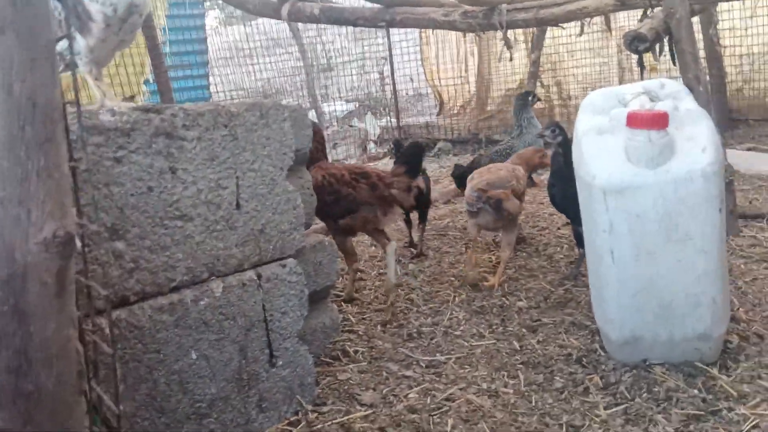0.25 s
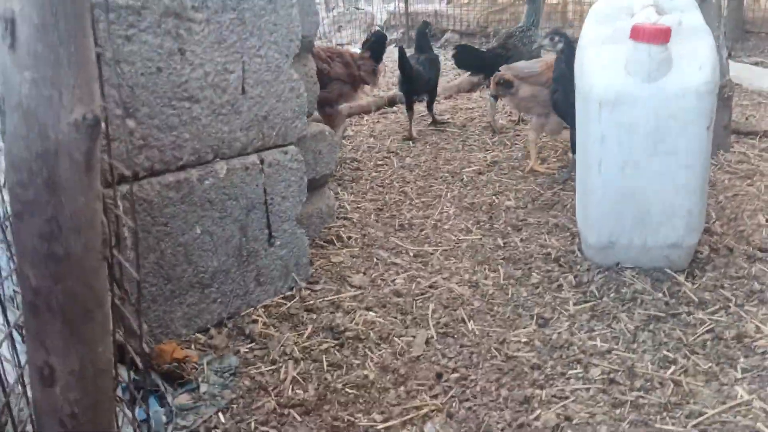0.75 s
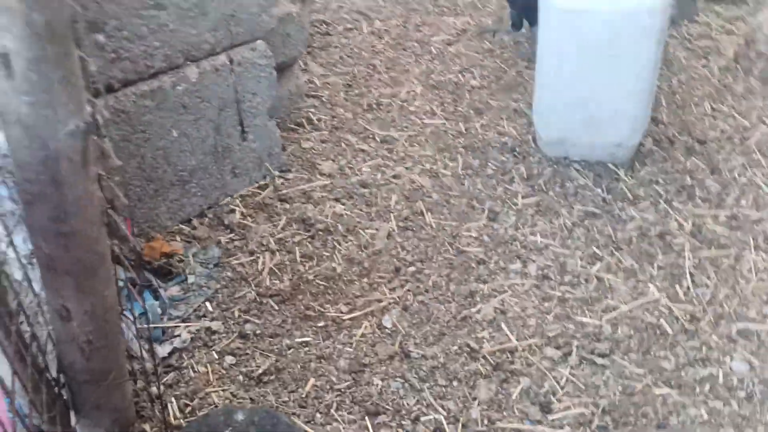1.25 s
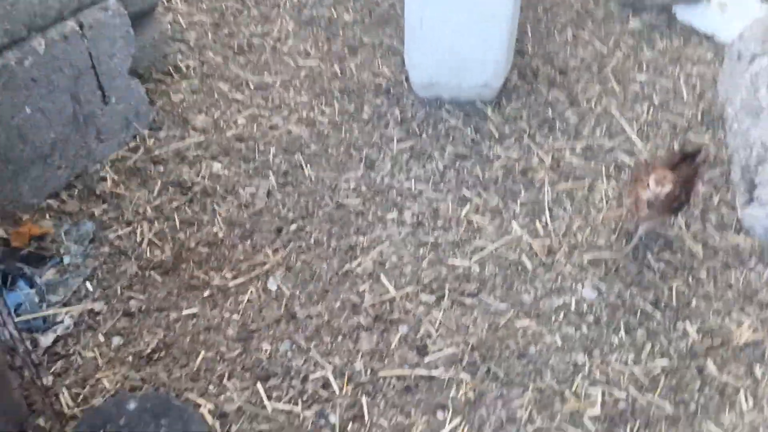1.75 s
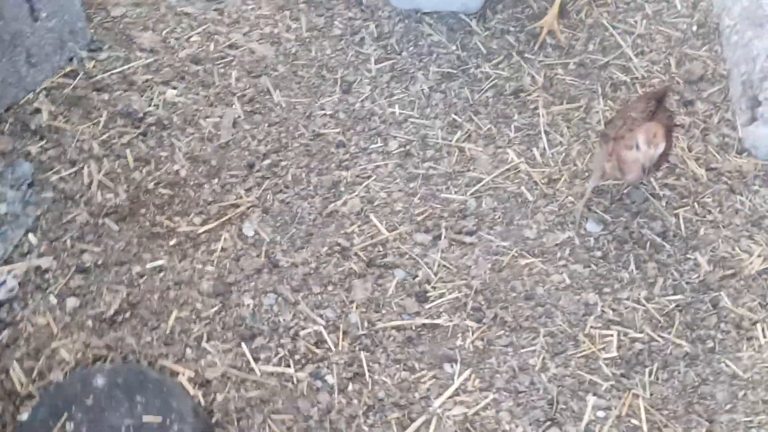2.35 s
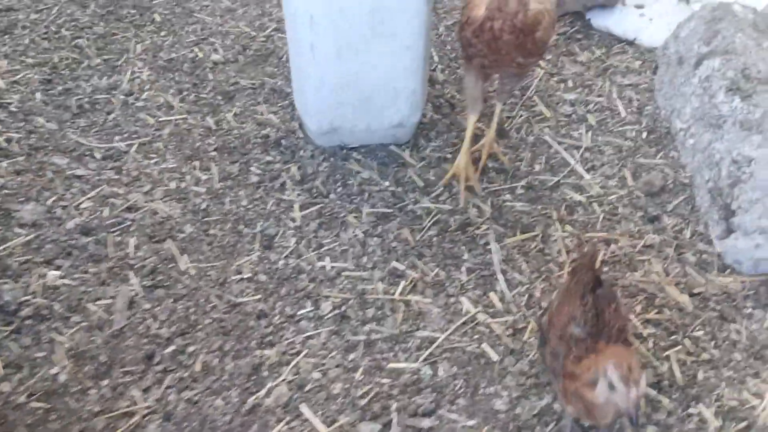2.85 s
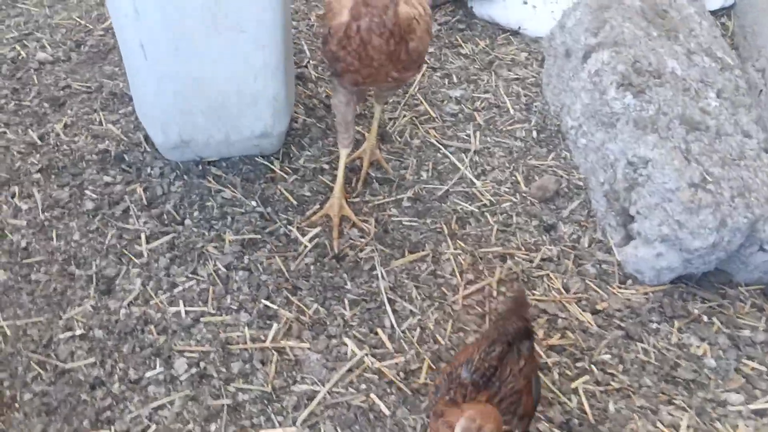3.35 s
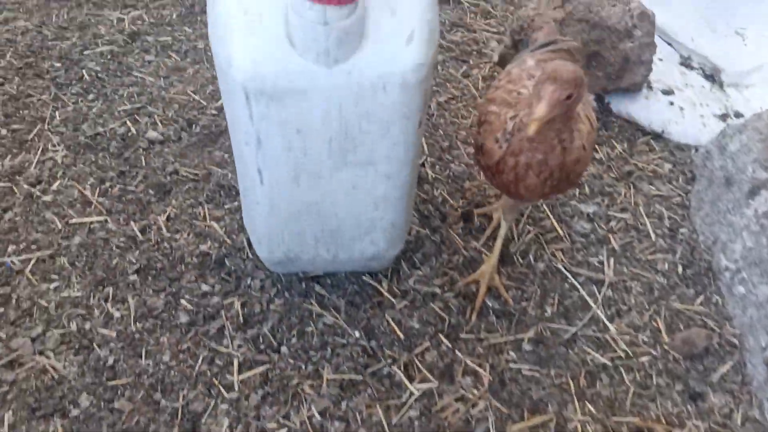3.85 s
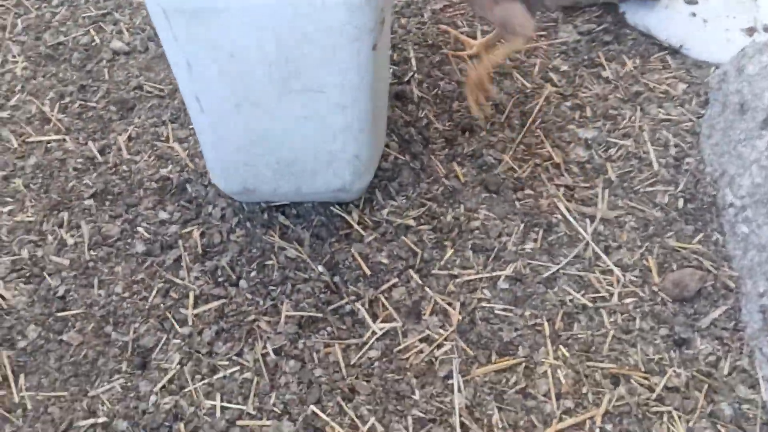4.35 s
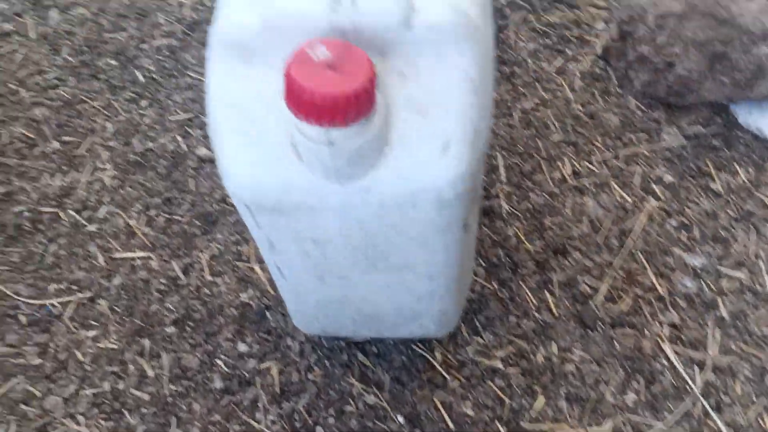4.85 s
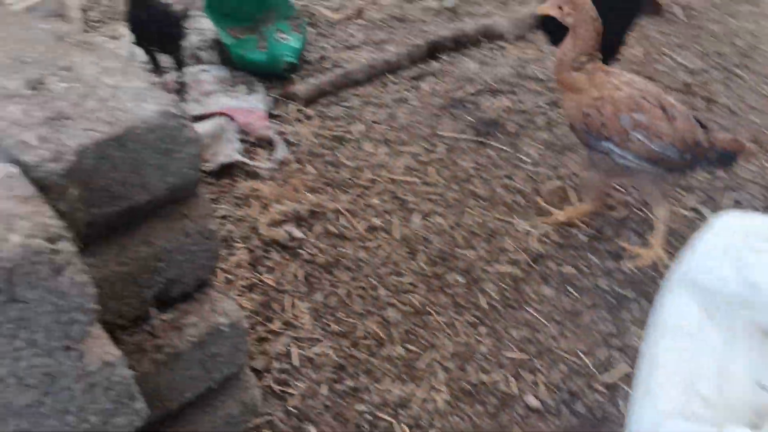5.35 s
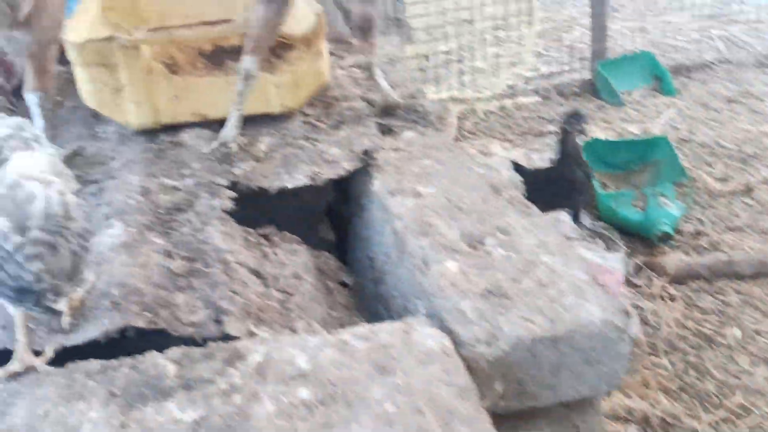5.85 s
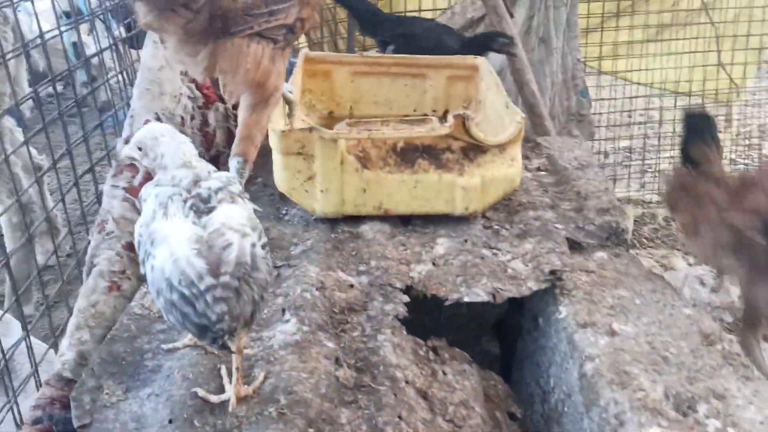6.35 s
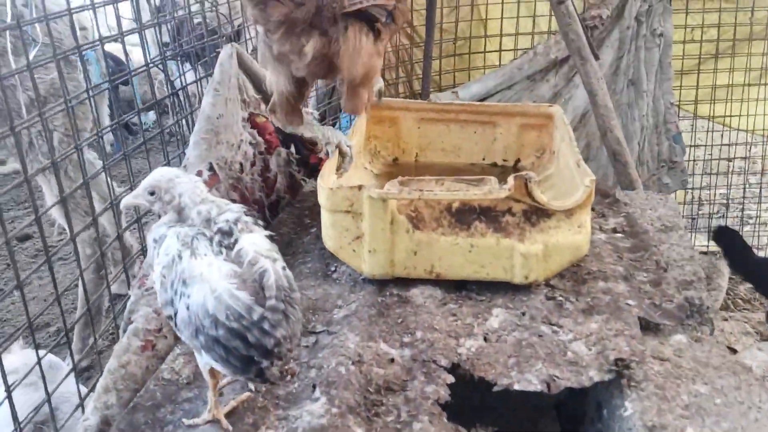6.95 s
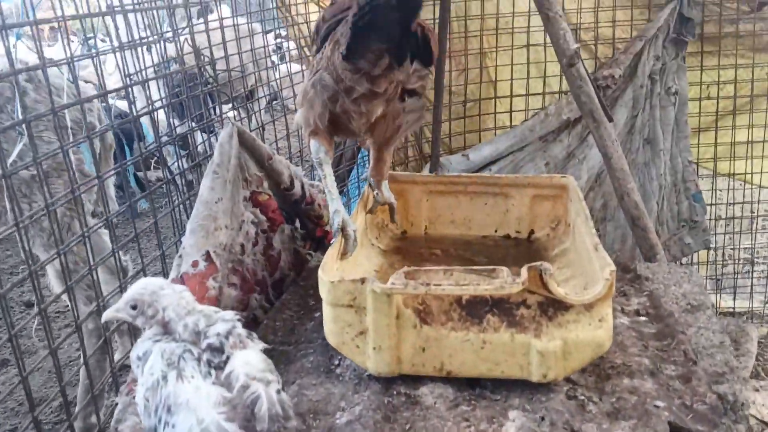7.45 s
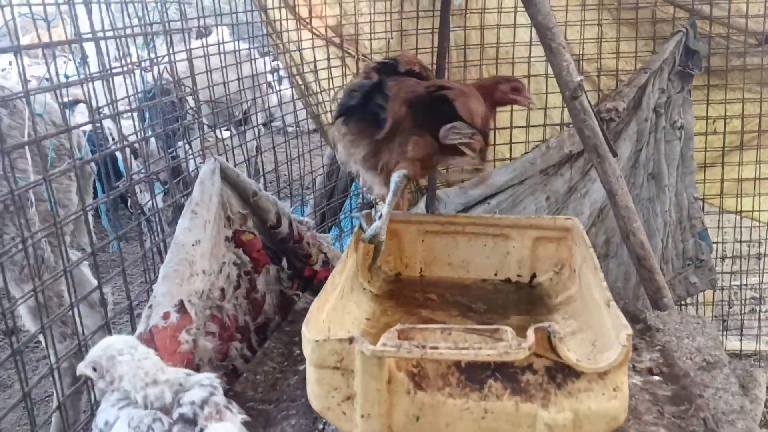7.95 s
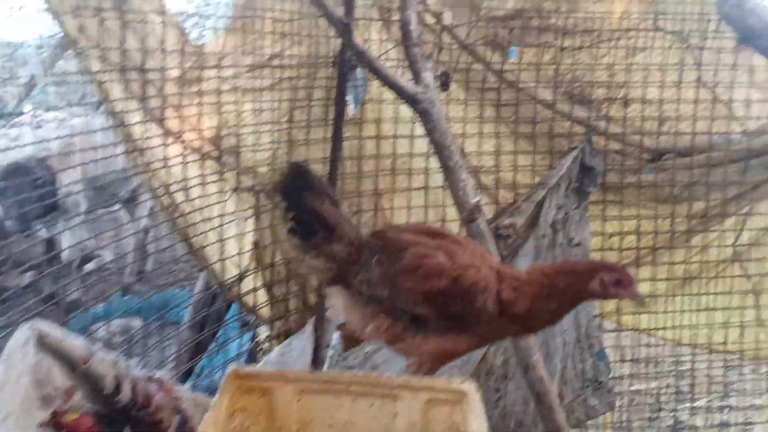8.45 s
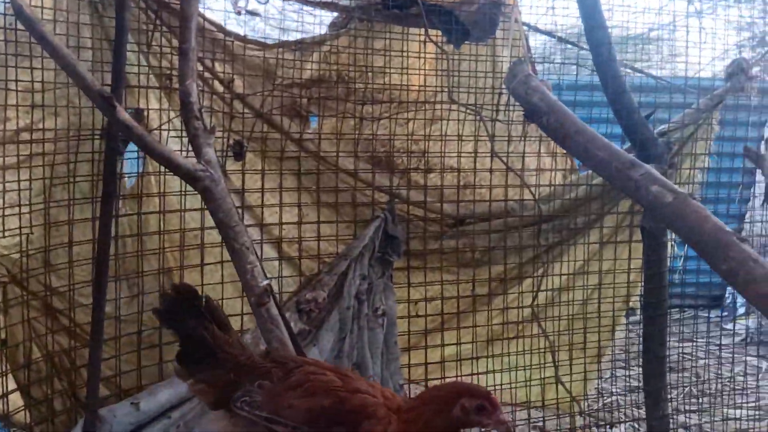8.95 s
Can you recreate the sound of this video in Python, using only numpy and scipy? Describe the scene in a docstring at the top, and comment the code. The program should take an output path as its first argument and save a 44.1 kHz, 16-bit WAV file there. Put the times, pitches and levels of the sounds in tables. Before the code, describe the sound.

Throughout, a small straw-floored coop murmurs with soft shuffling and faint distant cheeping. From 0 to 2.7 s, near chicks give short falling peeps around 3.5 kHz, with quiet clucks, a sharp straw scuff and footfall near 0.65 s, and a stronger peep at 2.6 s. At 2.8 s a close lamb hums nasally, then opens into a loud bright bleat, steady until 3.3 s, then shaking, leaning left and closing by 3.75 s. A low rattling croak and a piercing squeal come around 4.1 s. Heavy steps thud at 4.75 and 5.3 s amid straw scratching; a hoarse ewe bleats, throbbing, from 5.4 to 5.9 s. Peeps, clucks and thin whistles continue. From 7.1 s a plastic trough is knocked dully, brighter near 8 s; finger taps boom on the right from 7.6 s, wire pings at 8.35 s, and clucks grow clearer toward 9.1 s. Reverberation is short.

```python
"""Shuffling feet and peeping chicks open a straw-floored coop, heard at the two ports of a handheld phone.
Pullets cluck, scratch, knock a trough and peck the mesh; a lamb bleats close by and a hoarse ewe answers.
Chicks are gliding sines; clucks and bleats are throat pulses through resonances; straw and feet are shaped
noise; struck things ring as decaying sines. Later a finger taps the right port. The walls answer, and the
phone's suppressor pulls the background down between sounds."""
import sys
import numpy as np
from scipy import signal
from scipy.fft import rfft, irfft, next_fast_len
from scipy.io import wavfile
from scipy.ndimage import uniform_filter1d, map_coordinates

SR = 44100
rng = np.random.default_rng(int(sys.argv[2]) if len(sys.argv) > 2 else 0)


def to_wav(sig):
    """Store sig (one row per channel, or 1-D mono) as 16-bit WAV at the path in sys.argv[1].

    Samples outside -1..1 are clipped; the rate is SR.
    """
    pcm = np.clip(np.atleast_2d(sig), -1, 1) * 32767
    pcm = np.round(pcm).astype(np.int16)
    wavfile.write(sys.argv[1], SR, pcm.T)  # frames by channels


def gain_from_decibels(decibels):
    """Convert decibel values to linear amplitude factors."""
    exponent = np.asarray(decibels, float) / 20
    return 10 ** exponent


N = 405719

# shuffling feet all round, drifting between points: (start_s, thud_level_db, crackle_level_db)
BUSTLE = [(0, -66, -88.5), (0.58, -78, -69.5), (1.48, -68, -96.5), (2.85, -82, -76), (3.72, -77, -77),
          (4.85, -55.5, -76), (5.21, -78.5, -74), (6.34, -75, -91), (9.2, -73, -88.5)]
# heavy footfalls: (start_s, level_db)
STEPS = [(0.659, -52), (1.37, -62.5), (4.265, -55.5), (4.747, -41), (5.325, -37.5)]
STEP_T60_S = .25
# noise colour of feet on the floor: (frequency_hz, level_db)
THUD_COLOUR = [(25, -40), (45, -15), (90, 3.5), (200, -5.5), (900, -33)]
# noise colour of the flock's murmur: (frequency_hz, level_db)
MURMUR_COLOUR = [(300, -7.5), (1800, 0), (2700, 0.5), (3600, -7.5), (6500, -8), (8000, -28)]
# noise colour of bright straw stalks: (frequency_hz, level_db)
STRAW_COLOUR = [(3000, -29.5), (4500, -16), (6300, 4), (9000, -13), (11500, -9), (15200, -1.5),
                (16500, -29)]

# peeps of the near chicks, all falling alike: (start_s, top_hz, level_db)
PEEPS = [(0.053, 3459, -50), (0.145, 3533, -50), (0.3, 3602, -50.5), (0.746, 3509, -52.5),
         (0.887, 3782, -49.5), (1.079, 3509, -49.5), (1.352, 2986, -63.5), (4.322, 3620, -57.5),
         (1.42, 3148, -57.5), (1.498, 3314, -57), (1.662, 3465, -50), (1.805, 3505, -49.5),
         (2.254, 3515, -55.5), (2.415, 3579, -51.5), (2.629, 3589, -40), (3.8, 3575, -55),
         (4.862, 3354, -50.5), (5.894, 3432, -46), (6.081, 3470, -54)]
PEEP_LENGTH_S, PEEP_END_RATIO = .045, .74  # last pitch over the top
# short sagging chirps: (start_s, length_s, pitch_hz, level_db)
CHIRPS = [(0.082, 0.04024, 2744, -59), (4.671, 0.03753, 3022, -50.5), (4.863, 0.11854, 2634, -55),
          (0.952, 0.02221, 2402, -48), (0.973, 0.01292, 1608, -53.5), (1.113, 0.06043, 3016, -52),
          (1.541, 0.07446, 1790, -58), (1.588, 0.02187, 1338, -60.5), (1.085, 0.0255, 2283, -57),
          (3.98, 0.022, 3278, -40), (4.271, 0.02352, 1329, -40.5), (4.92, 0.02836, 1587, -45),
          (5.37, 0.055, 3228, -37), (6.129, 0.021376, 1554, -45.5), (6.306, 0.0438, 3090, -57),
          (8.157, 0.075, 2562, -60.5), (8.987, 0.05291, 1245, -54.5), (9.158, 0.0413, 3025, -57)]
CHIRP_END_RATIO = 0.93
# long high whistles: (start_s, length_s, top_hz, level_db)
WHISTLES = [(.44, .12, 6000, -60), (5.66, .11, 4800, -56), (6.385, .1, 3900, -59), (6.68, .05, 5000, -52),
            (7.15, .12, 6400, -56), (8.015, .14, 5600, -55)]
WHISTLE_FALL_HZ_PER_S = 16000
# falling squeals; the loudest, from a startled chick close by, is three overlapping glides:
# (start_s, length_s, start_hz, end_hz, level_db)
SQUEALS = [(4.163, .036, 4550, 3450, -26), (4.197, .11, 3400, 2450, -49), (4.19, .03, 3100, 1800, -47),
           (6.905, .12, 3300, 2750, -59)]
HOOK_S, HOOK_DEPTH = .006, 0.048  # a call slides up into its top note: time constant, share of the pitch

# claws and beaks in straw: (start_s, stalks_level_db, scuff_level_db, t60_s)
SCRATCHES = [(0.1688, -72.5, -46.5, 0.105), (0.462, -75, -56.5, 0.7619), (0.608, -56.5, -37, 0.04139),
             (0.6685, -53, -20.5, 0.014157), (2.19, -89.5, -60, 0.092), (2.517, -65, -60.5, 0.07234),
             (2.743, -54.5, -35, 0.11187), (2.833, -55, -38.5, 0.02562), (3.635, -56, -72.5, 0.03951),
             (3.914, -43.5, -77.5, 0.04432), (4.4297, -65.5, -76, 0.1286), (4.722, -53, -42.5, 0.37644),
             (4.836, -66.5, -49, 0.05066), (4.879, -59.5, -48, 0.16315), (4.9466, -51.5, -45, 0.10116),
             (5.302, -50.5, -46.5, 0.3362), (5.892, -60, -42, 0.1317), (6.065, -77.5, -59.5, 0.3822),
             (6.265, -79, -54, 0.13993), (6.551, -62.5, -52, 0.05853), (6.349, -65.5, -54, 0.06974),
             (6.743, -64, -69.5, 0.12), (6.976, -75, -55.5, 0.3101), (7.962, -79, -58.5, 0.715),
             (8.3412, -52, -53.5, 0.07392)]
# noise colour of the duller scuff: (frequency_hz, level_db)
SCUFF_COLOUR = [(150, -4), (400, 0), (1200, -3), (2600, -4), (4000, -14), (6000, -35.5)]
# pullets' clucks, and at 5.247 s a longer low hum leading into the ewe's bleat:
# (start_s, length_s, pitch_hz, level_db, beak_resonance_hz)
CLUCKS = [(0.438, 0.11605, 376.5, -60, 719.3), (1.87, 0.03615, 395.8, -57, 561.4),
          (1.978, 0.05755, 393.6, -53.5, 486), (3.987, 0.051325, 352.7, -53.5, 680),
          (5.247, 0.25052, 321.4, -53.5, 330.2), (5.6, 0.018427, 229.2, -48, 697.2),
          (6.556, 0.05068, 349.9, -64, 708), (4.462, 0.01728, 385.5, -57, 367.8),
          (7.043, 0.02613, 228.1, -60, 695), (6.16, 0.03298, 435.3, -62, 435),
          (7.567, 0.06996, 409.4, -55, 383), (8.392, 0.03492, 233, -57.5, 489.8),
          (8.723, 0.037073, 205.3, -43.5, 998), (9.068, 0.04017, 417.7, -41.5, 925.6)]

# the lamb's voice: (start_s, pitch_hz, source_level_db, second_resonance_hz, third_resonance_added_db)
LAMB = [(2.8, 225.5, -53.5, 2318, -18), (2.917, 257.5, -39, 2539, 1.5), (2.924, 253.3, -31, 2509, 2.5),
        (2.977, 265.9, -24, 2672, 1), (3.12, 277, -21, 2480, -4), (3.27, 280.6, -20.5, 2443, -9.5),
        (3.29, 271.1, -24, 2460, -4), (3.43, 268.7, -27, 2480, -4.5), (3.569, 267.1, -31.5, 2620, -12),
        (3.69, 247, -40.5, 2712, -11), (3.754, 228, -58, 2762, -2.5)]
# the lamb's roughness over time: (start_s, roughness_0_to_1)
LAMB_ROUGH = [(3.26, .01), (3.29, .09), (3.36, .26), (3.44, .05), (3.7, .16)]
# the lamb's throat resonances: (centre_hz, width_hz, gain_db)
LAMB_THROAT = [(1080.2, 100.6, 5.5), (2480, 122.51, 3.5), (3080.2, 193.28, 1), (4066.4, 385.94, -14),
               (5421.2, 160, -17.5), (9379, 2200, -37.5), (15008, 1300, -36)]
# the rougher the bleat, the more it shakes; breath noise rasps in the upper voice
QUAVER_PER_S, QUAVER_FROM_S, QUAVER_DB, RASP_DB = 19, 3.29, 1.2, 4
WANDER, WANDER_DB = .018, 1.3  # random drift of the middle resonances: share of the centre, and gain in dB
CLOSES_DB = -38  # under this source level the mouth shuts off the middle resonances
THIRD_RISES_HZ = 415.4  # as the bleat breaks, its third resonance jumps up
TREBLE_HZ, TREBLE_FADE = 6800, 0.94  # extra dB lost up there for each dB below the loudest
TURNS_S, TURNS_DB = 3.2991, 3  # the lamb turns its head to the left port
# from the lamb's side the phone's body bends the left port's lag: (frequency_hz, phase_radians)
BODY_TURN = [(300, 0.5), (900, 2.5), (1700, -0.4339), (2400, 0.5271), (3300, -1.6576), (4300, 0.5)]

# a slow rattling croak
CROAK_START_S, CROAK_LENGTH_S, CROAK_PULSES_PER_S, CROAK_LEVEL_DB = 4.08, .11, 64, -53
# throat resonances of the croak: (centre_hz, width_hz, gain_db)
CROAK_THROAT = [(1084, 270, -0.5), (1790, 300, 2), (2390, 300, -2.5)]
# the ewe's voice: (start_s, pitch_hz, level_db)
EWE = [(5.41, 205.7, -50), (5.5, 217, -46), (5.62, 226.3, -40.5), (5.82, 216.7, -45), (5.9, 226, -44.5)]
# the ewe's throat resonances, passed twice: (centre_hz, width_hz, gain_db_per_pass)
EWE_THROAT = [(852.37, 93.67, 5), (1896, 264.25, 1.5), (2777.8, 664.2, -5.5), (4632, 2051, -13)]

# claws and beaks knock the plastic trough: (start_s, level_db, pitch_factor: how high each blow rings)
KNOCKS = [(7.146, -42, 0.6445), (7.251, -35.5, 0.58987), (7.442, -41, 0.57796), (7.995, -28.5, 1.1452),
          (8.115, -31.5, 1.526), (8.659, -41, 0.6384)]
# ringing modes of the trough: (frequency_hz, level_db, t60_s)
TROUGH = [(620, -8, .05), (1000, -2, .025), (1250, 0, .02), (2200, -14, .02)]
# finger taps on the right port: (start_s, click_level_db, boom_level_db)
TAPS = [(7.579, -38.5, -26.5), (7.764, -59, -33.5), (8.0869, -28, -24), (8.229, -26, -62),
        (8.718, -33, -22), (9.051, -39, -29), (9.146, -34.5, -25)]
# a beak on the wire mesh: (start_s, level_db)
PINGS = [(8.3425, -40.5), (8.437, -51.5)]
# ringing modes of the mesh: (frequency_hz, level_db, t60_s)
MESH = [(2026.4, -8, 0.0441), (3167.6, 2, 0.015236), (3981, -4, 0.04277), (6031.6, 5, 0.02071)]

# how the coop's reverberation dies: (frequency_hz, t60_s)
COOP = [(200, 0.18), (2000, 0.11), (10000, 0.0021)]
# level difference between the microphone ports: (frequency_hz, left_minus_right_db)
PORTS = [(100, -2), (400, 10), (1300, 3), (3000, -7), (4400, 6), (6300, -2), (9000, 7)]
MIC_LOW_HZ, MIC_TOP_HZ = 47.197, 16266


def unit(x):
    """Scales to rms 1."""
    return x / np.sqrt(np.mean(x ** 2) + 1e-20)


def along(points, hz):
    """Reads (frequency, value) points on a log frequency axis."""
    f, value = np.transpose(points)
    return np.interp(np.log(hz + 1), np.log(f + 1), value)


def curves(rows):
    """One value per sample for each column after the time."""
    s, *columns = np.transpose(rows)
    return [np.interp(np.arange(N) / SR, s, column) for column in columns]


def span(rows):
    """Sample range of a curve table."""
    return slice(round(rows[0][0] * SR), round(rows[-1][0] * SR))


def add_at(out, start_s, sound):
    """Mixes a sound into out from its start time."""
    out[round(start_s * SR):][:len(sound)] += sound


def wobble(rate, size=N):
    """A smooth random curve with rate knots a second."""
    knots = rng.standard_normal(int(size * rate / SR) + 4)
    return map_coordinates(knots, [np.arange(size) * rate / SR])


def filtered(x, response):
    """Multiplies the spectrum of x by a complex response of frequency."""
    m = next_fast_len(x.shape[-1] + 8192)
    return irfft(rfft(x, m) * response(np.fft.rfftfreq(m, 1 / SR)), m)[..., :x.shape[-1]]


def noise(colour):
    """Coloured noise of rms 1."""
    return unit(filtered(rng.standard_normal(N), lambda hz: gain_from_decibels(along(colour, hz))))


def throat(modes):
    """Causal sum of resonances; the extra slope keeps it dark below the first."""
    def response(f):
        total = 0
        for k, (centre, width, db) in enumerate(modes):
            damping = 1j * f * width
            total = total + (-1) ** k * gain_from_decibels(db) * damping / (centre * centre - f * f + damping)
        return f / (f + 500) * total
    return response


def glottis(hz, rough, jitter):
    """Sharp pulses at the pitch, mixed with breath noise gated once a cycle; also returns the phase."""
    phase = 2 * np.pi * np.cumsum(hz * (1 + jitter * wobble(120, size=len(hz)))) / SR
    count = np.floor(16200 / np.max(hz))
    pulses = np.sin((count + .5) * phase) / (2 * np.sin(phase / 2) + 1e-9) - .5  # equally strong harmonics
    breath = (1 + np.cos(phase)) * rng.standard_normal(len(hz))
    rough = np.clip(rough, 0, 1)
    return np.sqrt(1 - rough) * unit(pulses) + np.sqrt(rough) * unit(breath), phase


def crackly(density):
    """A gain that spikes where single stalks snap, density times a second on average."""
    snaps = (rng.random(N) < density / SR) * 2.88 * rng.exponential(size=N)
    return 1 + signal.lfilter([1], [1, -np.exp(-1 / (0.0014 * SR))], snaps)


def bustle(alike):
    """The flock all round: noise partly the same at both ports, restless at several speeds."""
    thud_db, crackle_db = curves(BUSTLE)
    stir = wobble(3.5002)

    def pair(colour):
        apart = np.array([noise(colour), noise(colour)])
        return alike * noise(colour) + np.sqrt(1 - alike ** 2) * apart

    thud = (gain_from_decibels(thud_db + 2 * stir + 5 * wobble(12)) + steps()) * pair(THUD_COLOUR)
    # more crackle, more murmur
    murmur = gain_from_decibels(-25 + .5 * crackle_db + stir + 3 * wobble(23)) * pair(MURMUR_COLOUR)
    crackle = gain_from_decibels(crackle_db + 2 * stir) * crackly(60) * pair(STRAW_COLOUR)
    return thud + murmur + crackle


def peeps(calls):
    """Falling whistles with a faint octave and a flutter; the lower ones hang at the top before they drop."""
    out = np.zeros(N + SR)
    for start_s, length_s, start_hz, end_hz, db in calls:
        u = np.arange(round(length_s * SR)) / (length_s * SR)
        fall = np.cos(np.pi * u / 2) ** 2 if start_hz < 4000 else (1 - u) ** 1.6
        hook = 1 - HOOK_DEPTH * np.exp(-u * length_s / HOOK_S)
        flutter = 0.016 * wobble(150, size=len(u))
        hz = (end_hz + (start_hz - end_hz) * fall) * (hook + flutter)
        phase = 2 * np.pi * np.cumsum(hz) / SR
        swell = np.sin(np.pi * u ** 0.61) ** .5 * gain_from_decibels(3.4 * wobble(110, size=len(u)))
        add_at(out, start_s, gain_from_decibels(db) * swell * (np.sin(phase) + gain_from_decibels(-30) * np.sin(2 * phase)))
    echo = round(.012 * SR)
    out[echo:] += 0.13 * out[:-echo].copy()  # a block wall doubles each glide
    return out[:N]


def near_chicks():
    """Peeps, squeals, whistles and chirps, each a glide (start_s, length_s, start_hz, end_hz, level_db)."""
    falling = [(s, PEEP_LENGTH_S, hz, PEEP_END_RATIO * hz, db) for s, hz, db in PEEPS]
    whistles = [(s, length, hz, hz - WHISTLE_FALL_HZ_PER_S * length, db) for s, length, hz, db in WHISTLES]
    chirps = [(s, length, hz, CHIRP_END_RATIO * hz, db) for s, length, hz, db in CHIRPS]
    return peeps(falling + SQUEALS + whistles + chirps)


def far_chicks():
    """One distant chick whistles at a steady beat; other short glides cheep faintly at random."""
    beat = [(s, .09, 6200, 3400, -68) for s in np.arange(.309, 9.1, .3931)]
    cheeps = [(9 * a, .015 + .04 * b, 2300 + 1500 * c, 2000 + 1000 * c, -74 + 9 * d)
              for a, b, c, d in rng.random((60, 4))]
    return peeps(beat + cheeps)


def scratches():
    """Each scratch starts with a snap and dies away: bright stalks over a duller scuff."""
    bright, dull, t = np.zeros(N + SR), np.zeros(N + SR), np.arange(SR // 2) / SR
    for start_s, stalks_db, scuff_db, t60 in SCRATCHES:
        fall = gain_from_decibels(-60 * t / t60) * (1 - np.exp(-t / 0.00051))
        add_at(bright, start_s, gain_from_decibels(stalks_db) * fall)
        add_at(dull, start_s, gain_from_decibels(scuff_db) * fall * (1 - np.exp(-t / .006)))
    stalks = crackly(160) * bright[:N] * noise(STRAW_COLOUR)
    scuff = gain_from_decibels(4.7 * wobble(150)) * dull[:N] * noise(SCUFF_COLOUR)
    return stalks + scuff


def clucks():
    """Arched pulse trains through a windpipe and an open beak: short clucks, and the ewe's longer lead-in hum."""
    out = np.zeros(N + SR)
    for start_s, length_s, hz, db, beak_hz in CLUCKS:
        u = np.arange(round(length_s * SR)) / (length_s * SR)
        pitch = hz * (1 + .03 * np.sin(np.pi * u) - .03 * u)
        source = glottis(pitch, .12, jitter=.012)[0]
        source = np.pad(source * np.sin(np.pi * u ** 1.652), (0, 800))  # room to ring on
        modes = [(beak_hz, 0.17945 * beak_hz, 0), (1700, 500, -21), (400, 160, -4)]
        voice = unit(filtered(source, lambda f: throat(modes)(f) / (1 + (f / 5000) ** 2)))
        add_at(out, start_s, gain_from_decibels(db) * voice)
    return out[:N]


def steps():
    """Thud gain of each footfall: it swells quickly and rumbles away."""
    out, t = np.zeros(N + SR), np.arange(SR // 2) / SR
    for start_s, db in STEPS:
        add_at(out, start_s, gain_from_decibels(db - 60 * t / STEP_T60_S) * (1 - np.exp(-t / 0.00202)))
    return out[:N]


def lamb_source(hz, db, rough, clock_s):
    """The lamb's throat pulses and breath, shaking in pitch and level with the roughness."""
    size = len(hz)
    quaver = np.cos(2 * np.pi * QUAVER_PER_S * (clock_s - QUAVER_FROM_S))
    shake = np.sqrt(rough) * (wobble(40, size=size) - quaver)
    source, phase = glottis(hz * (1 + .021 * shake), rough / 5, jitter=.004)
    rasp = filtered(rng.standard_normal(size), lambda f: 1 / (1 + (3000 / (f + 1)) ** 4))
    source = source + gain_from_decibels(RASP_DB) * np.sqrt(rough) * (1 + np.cos(phase)) * rasp
    return source * gain_from_decibels(db + .5 * wobble(30, size=size) + QUAVER_DB * shake), phase


def lamb_mouth(source, db, second_hz, third_db):
    """Moving throat resonances shape the source frame by frame."""
    size = len(source)
    f, t, z = signal.stft(source, SR, nperseg=1024, noverlap=896)
    f = f[:, None]
    at = np.clip((t * SR).astype(int), 0, size - 1)

    def drift():
        return wobble(23, size=size)[at]

    closing_db = np.clip(db - CLOSES_DB, None, 0)[at]
    shape = [[centre * (1 + WANDER * drift()), width, gain + WANDER_DB * drift() + closing_db]
             for centre, width, gain in LAMB_THROAT]
    shape[0], shape[-2:] = LAMB_THROAT[0], LAMB_THROAT[-2:]  # the lowest and two highest stay put
    shape[1][0] = second_hz[at]  # this centre follows the voice table
    shape[2][2] = shape[2][2] + third_db[at]
    breaking = np.clip(20 * (t + LAMB[0][0] - QUAVER_FROM_S), 0, 1)
    shape[2][0] = shape[2][0] + THIRD_RISES_HZ * breaking
    treble_gain = gain_from_decibels(TREBLE_FADE * (db - db.max())[at])
    fading = 1 + (treble_gain - 1) / (1 + (TREBLE_HZ / (f + 1)) ** 12)
    fading = fading / (1 + (680 / (f + 1)) ** 4)  # thin below the first resonance
    return signal.istft(z * throat(shape)(f) * fading, SR, nperseg=1024, noverlap=896)[1][:size]


def lamb():
    """A nasal hum; then the mouth opens onto a bright bleat, steady, then shaking, and closes again."""
    out, on = np.zeros(N), span(LAMB)
    hz, db, second_hz, third_db = (c[on] for c in curves(LAMB))
    rough = curves(LAMB_ROUGH)[0][on]
    source, phase = lamb_source(hz, db, rough, np.arange(N)[on] / SR)
    oral = gain_from_decibels(14.5) * lamb_mouth(source, db, second_hz, third_db)
    t = np.arange(len(hz)) / SR
    shut = np.exp(-np.clip(t - .09, 0, 1) / 0.0037)  # the lips part after about a tenth of a second
    hum = gain_from_decibels(db) * (shut + gain_from_decibels(-35)) * np.sin(phase)
    out[on] = signal.windows.tukey(len(hz), .03) * (oral + hum)
    return out


def croak():
    """Separate slow pulses, each ringing the throat."""
    out, size = np.zeros(N), round(CROAK_LENGTH_S * SR)
    source = glottis(np.full(size, CROAK_PULSES_PER_S), .06, jitter=.03)[0]
    source = source * signal.windows.tukey(size, .3)
    voice = unit(filtered(source, throat(CROAK_THROAT)))
    add_at(out, CROAK_START_S, gain_from_decibels(CROAK_LEVEL_DB) * voice)
    return out


def ewe():
    """A rough bleat that starts smooth, then throbs: each throb swells and chokes off."""
    out, on = np.zeros(N), span(EWE)
    hz, db = (c[on] for c in curves(EWE))
    t = np.arange(len(hz)) / SR
    throb = (21.3 * (t + 0.0072)) % 1
    source = glottis(hz * (1 + .04 * throb), .4, jitter=.045)[0]
    throb_gain = gain_from_decibels(3 * throb) * np.clip(3 * (1 - throb), .03, 1)
    source = source * throb_gain ** np.clip(10 * t - .2, 0, 1)

    def voice(modes):
        low = throat([(500, 500, 0)])
        return unit(filtered(source, lambda f: throat(modes)(f) ** 2 + gain_from_decibels(-15) * low(f)))

    # the mouth closes: the upper resonances go and the low ones hum on
    shut = np.arange(len(hz)) > (EWE[-2][0] - EWE[0][0]) * SR
    bleat = np.where(shut, voice(EWE_THROAT[:1]), voice(EWE_THROAT))
    out[on] = gain_from_decibels(db - 6.376 * shut) * bleat * signal.windows.tukey(len(hz), .1)
    return out


def struck(hits, modes, attack_s):
    """Each blow rings the decaying modes anew, a little differently."""
    out, t = np.zeros(N + SR), np.arange(SR // 10) / SR
    for start_s, db, *pitch in hits:
        ring = 0
        for hz, level, t60 in modes:
            fall = gain_from_decibels(level + rng.normal(0, 2.5) - 60 * t / t60)
            ring = ring + fall * np.sin(2 * np.pi * hz * np.prod(pitch) * t)
        attack = 1 - np.exp(-t / attack_s)
        add_at(out, start_s, gain_from_decibels(db) * ring * attack * gain_from_decibels(2 * wobble(300, size=len(t))))
    return out[:N]


def knocks():
    """Claws and beaks ring the short dull modes of the plastic trough."""
    return struck(KNOCKS, TROUGH, attack_s=0.0007613)


def taps():
    """A fingertip closes the right port: one sharp swing, then the trapped air rings low."""
    out, t = np.zeros(N + SR), np.arange(SR // 10) / SR
    for start_s, click_db, boom_db in TAPS:
        click = np.exp(-((t - .002) / 0.0009875) ** 2) * np.cos(2 * np.pi * 620 * (t - .002))
        cycles = 120 * t + 0.5526 * (1 - np.exp(-t / 0.0013167))  # the pitch drops quickly to 120 Hz
        boom = -gain_from_decibels(-60 * t / 0.04772) * np.sin(2 * np.pi * cycles) * np.clip(t / 0.004432, 0, 1)
        add_at(out, start_s - .002, gain_from_decibels(click_db) * click + gain_from_decibels(boom_db) * boom)
    return out[:N] * np.array([[.03], [1]])


def pings():
    """A beak rings the bright modes of the wire mesh."""
    return struck(PINGS, MESH, attack_s=0.00028)


def coop(x):
    """Tarpaulin and block walls answer as decaying noise, each frequency dying at its own speed."""
    hz, t, z = signal.stft(rng.standard_normal((2, SR // 3)), SR, nperseg=256)
    tail = signal.istft(z * gain_from_decibels(-60 * t / along(COOP, hz)[:, None]), SR, nperseg=256)[1]
    tail = tail / np.linalg.norm(tail[0])
    return signal.fftconvolve(np.pad(x, (150, 0))[None], tail, axes=1)[:, :N]


def ports(x, lag, turn=((1, 0),)):
    """The left port hears lag seconds late, and the phone's body shades each side its own way."""
    side = np.array([[.5], [-.5]])

    def response(hz):
        late = 2 * np.pi * hz * lag + along(turn, hz)
        return gain_from_decibels(side * along(PORTS, hz)) * np.exp(-1j * late * (side + .5))

    return filtered(x * np.ones((2, 1)), response)


def scene():
    """Birds and sheep in the coop, direct and off the walls, at the two ports."""
    young, old = lamb(), ewe()
    hens = clucks() + croak() + knocks()
    straw = scratches() + pings()
    chicks = near_chicks() + far_chicks()
    wet = gain_from_decibels(-13) * (young + old) + gain_from_decibels(-6.5) * (hens + straw) + gain_from_decibels(-5) * chicks

    floor = ports(straw + chicks + bustle(alike=0.49), lag=0.00077327)
    near = floor + ports(old, lag=0.00058834) + ports(hens, lag=0.0010167)
    turning = np.clip(5 * (np.arange(N) / SR - TURNS_S), 0, 1)
    left_db = 0.7465 + TURNS_DB * turning  # the right port loses what the left gains
    bleat = gain_from_decibels(left_db * [[1], [-1]]) * ports(young, lag=35 / SR, turn=BODY_TURN)
    return near + bleat + coop(wet) + taps()


def suppressor(x, floor_db, depth_db):
    """Broad bands that stay near the noise level are turned down, and let through beside louder sounds."""
    z = signal.stft(x, nperseg=512)[2]
    power = np.mean(np.abs(z) ** 2, 0)
    power = uniform_filter1d(power, size=41, axis=0)  # across frequency
    power = np.abs(uniform_filter1d(power, size=3, axis=1))  # across time
    openness = power / (power + gain_from_decibels(2 * floor_db))
    return signal.istft(z * gain_from_decibels(depth_db * (openness - 1)), nperseg=512)[1][:, :N]


def band_limit(x):
    """A steep low-pass at the top of the band."""
    return signal.sosfilt(signal.butter(12, 17010, fs=SR, output="sos"), x)


def record(dry):
    """The microphone's band limits, then the phone's suppressor."""
    def microphone(hz):
        low_cut = (1j * hz / (MIC_LOW_HZ + 1j * hz)) ** 2
        return low_cut / (1 + (hz / MIC_TOP_HZ) ** 60)

    mix = suppressor(filtered(dry, microphone), floor_db=-79.0, depth_db=7.5)
    return band_limit(mix)


dry = scene()
out = record(dry)
to_wav(out)
```